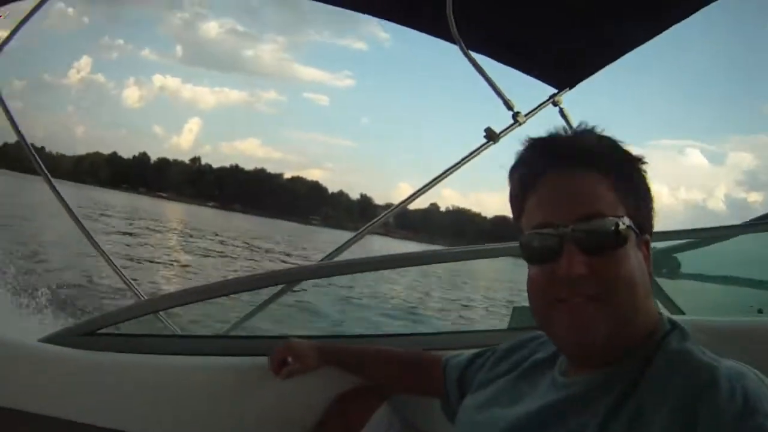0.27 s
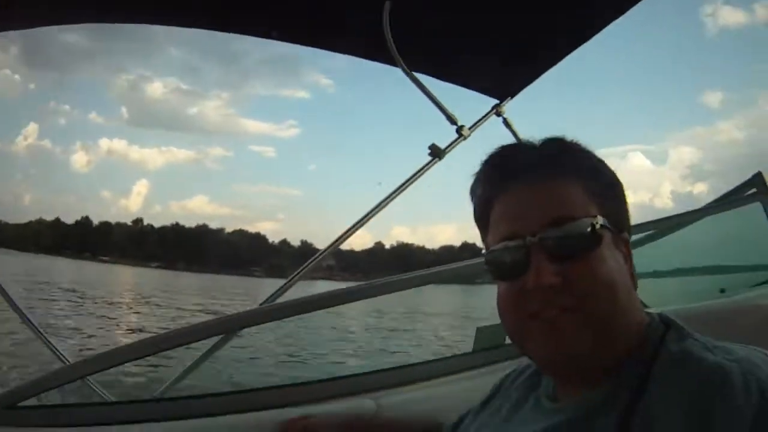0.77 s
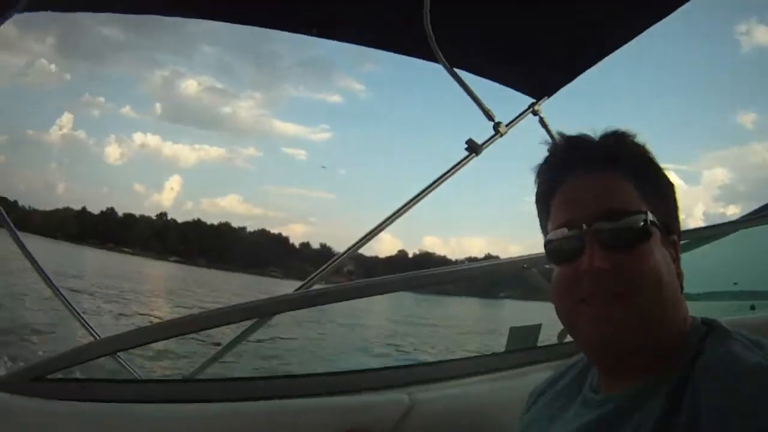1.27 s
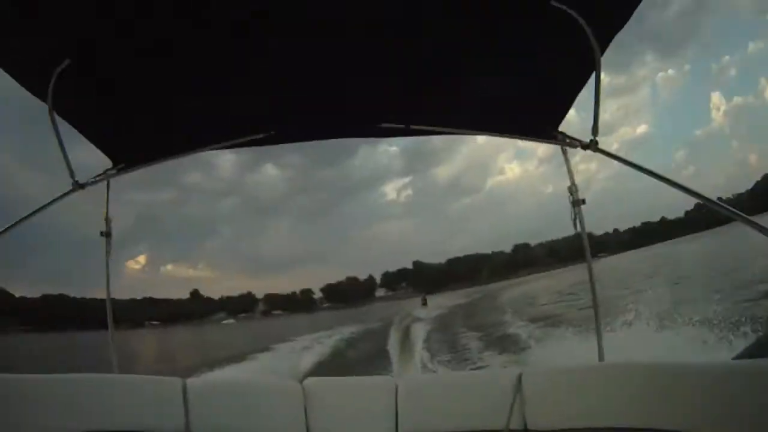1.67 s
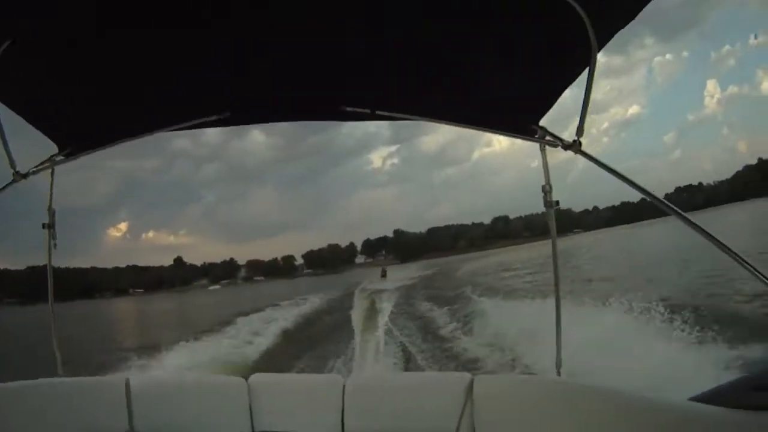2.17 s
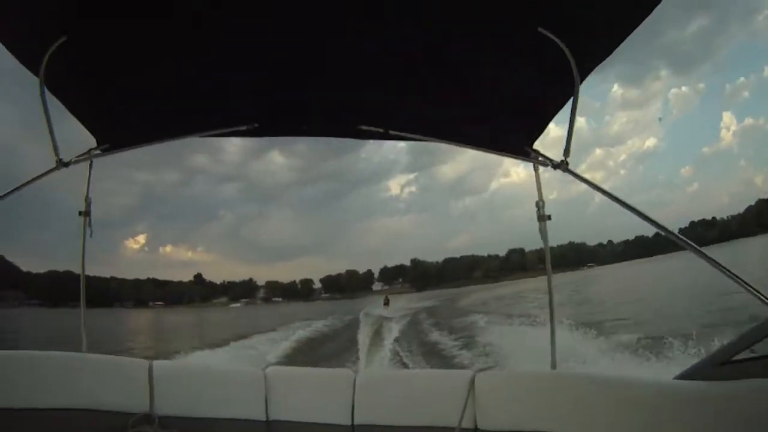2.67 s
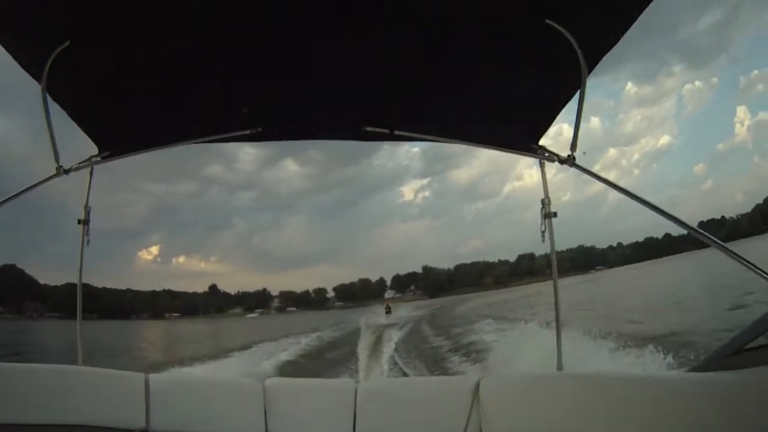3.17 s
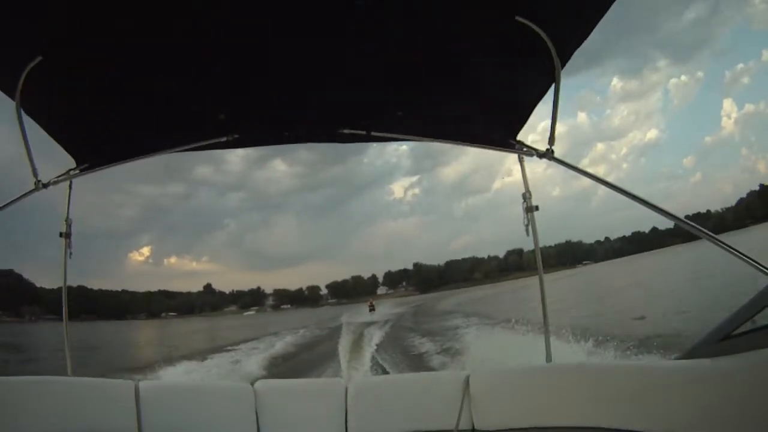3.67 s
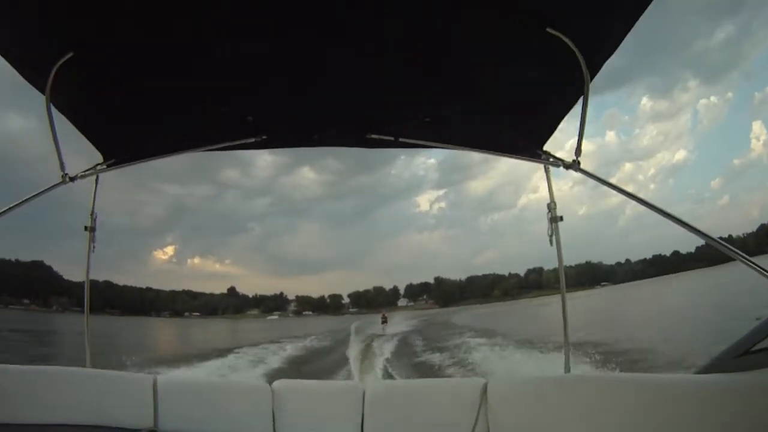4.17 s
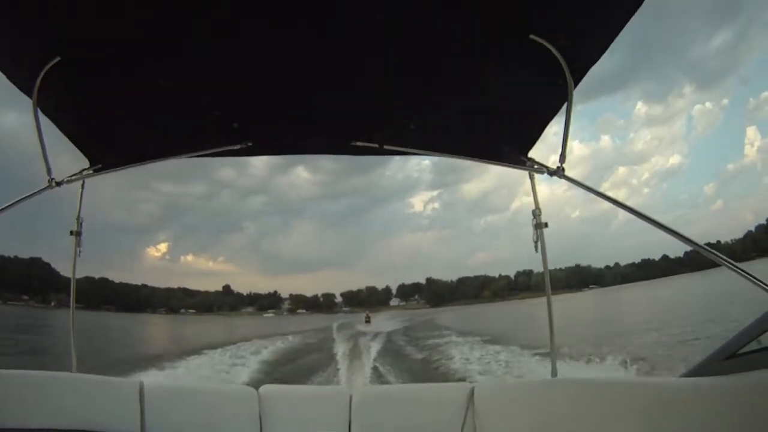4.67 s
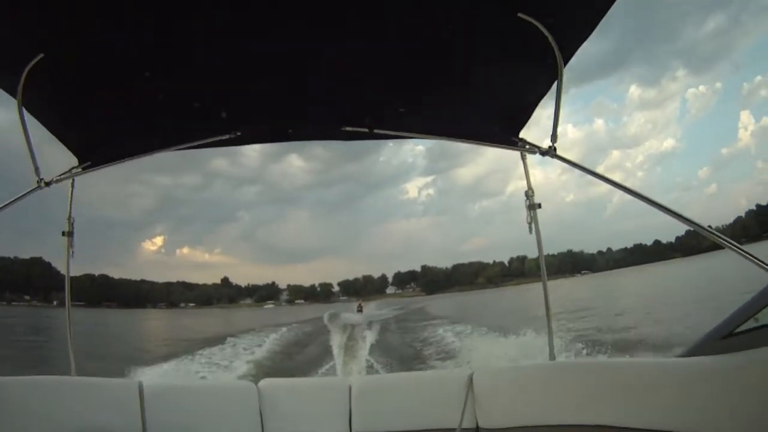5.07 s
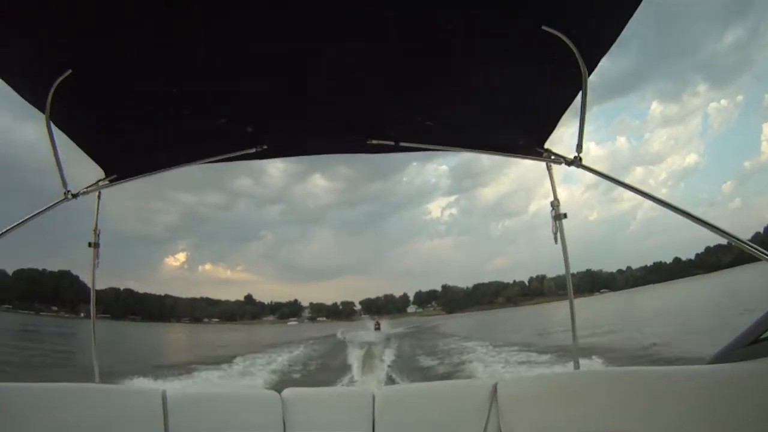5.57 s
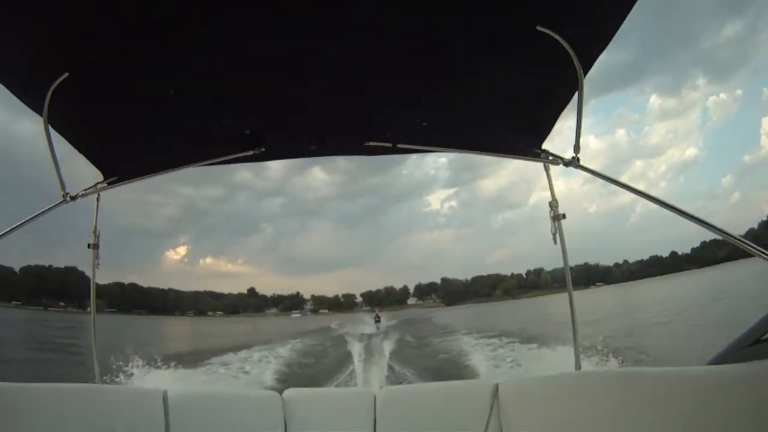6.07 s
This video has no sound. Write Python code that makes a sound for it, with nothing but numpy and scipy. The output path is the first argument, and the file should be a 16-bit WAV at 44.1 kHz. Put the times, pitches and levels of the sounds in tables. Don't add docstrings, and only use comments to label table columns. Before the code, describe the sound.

Inside a sealed plastic case on a towing motorboat, a steady low engine hum and boxy spray hiss run throughout. Wind and grip rumbles are strongest at first; a sharp rattling creak comes early, then scattered ticks and dull wave slaps as the camera turns sternward. The later part is calmer, with a few faint clicks.

```python
import sys
import numpy as np
from scipy import signal
from scipy.fft import rfft, irfft
from scipy.io import wavfile
from scipy.ndimage import uniform_filter1d

SR = 44100
rng = np.random.default_rng(int(sys.argv[2]) if len(sys.argv) > 2 else 0)


def persist_wave(psi):
    counts = np.round(np.clip(psi, -1, 1) * 32767).astype(np.int16)
    wavfile.write(sys.argv[1], SR, np.atleast_2d(counts).T)


def boost_factor(decibels):
    exponent = np.asarray(decibels, float) / 20
    return 10 ** exponent


N = 279153

# t/s, level/dB
BREEZE = [(0, -48), (1.0, -48), (1.5, -51), (2.6, -51), (3.2, -54), (4.0, -56.5), (5.0, -53.5), (6.33, -57)]
# t/s, peak level/dB, width/s
GUSTS = [(.08, -38, .05), (.19, -37, .03), (.32, -38, 0.044), (.46, -37, 0.031), (.77, -36, 0.034),
         (.93, -38.5, 0.027), (1.18, -41, 0.028), (1.33, -39, 0.018), (1.65, -48, .06), (2.06, -44, 0.027),
         (2.24, -43, 0.017), (2.45, -44, 0.046), (2.58, -40.5, 0.019), (3.95, -52, .05), (4.18, -50, 0.033),
         (4.36, -50, .06), (5.1, -54, .04)]
# t/s, peak level/dB, width/s
HULL_SWELLS = [(.08, -53, 0.051), (.41, -49, 0.044), (1.18, -40.5, .04), (1.32, -41, .04),
               (1.88, -41, 0.068), (2.08, -50, 0.039), (2.6, -47, 0.065), (4.3, -48, .08),
               (5.06, -47, 0.023), (5.33, -48, 0.034)]

# t/s, shell level/dB, thud level/dB, lid level/dB, latch level/dB
SLIPS = [(0.2906, -24, -47, -45, -35), (0.3068, -24, -25.5, -27, -36), (0.3111, -25, -23.5, -26, -31),
         (0.3255, -23, -22.5, -30, -27), (0.3365, -24, -37, -39, -32), (0.3387, -23.5, -27, -27, -21.5),
         (0.3429, -20, -22, -33, -25), (0.3521, -29, -35, -52, -40), (0.362, -30, -50, -54, -27),
         (0.3732, -26, -32, -52, -33), (0.4094, -37, -40, -34, -29), (0.4442, -48, -34, -45, -38)]
# t/s, level/dB
CREAKS = [
    (0.4113, -1.4),
    (0.4181, 0.5),
    (0.4268, 0.1),
    (0.4458, 2.8),
    (0.452, 1.0),
    (0.4575, 0.5),
    (0.4633, -0.2),
    (0.4716, -1.2),
    (1.3289, -7.5),
]
# t/s, level/dB, f/Hz, t60/s
PALM_BUMP = (1.3286, -1, 230, .005)
# t/s, latch level/dB, shell level/dB
LATCH_TICKS = [(0.0032, -31, -30.5), (0.6304, -36, -41), (0.7698, -32.5, -30), (0.7818, -24, -29),
               (0.7925, -24.5, -33), (0.809, -44, -35), (0.8318, -36, -48), (0.8567, -39, -33),
               (0.8748, -26.5, -22.5), (0.9024, -36, -43), (1.4493, -37, -30), (2.0572, -30, -42),
               (2.0737, -26.5, -33), (2.1311, -26.5, -28.5)]
# t/s, lid level/dB, shell level/dB
LID_TICKS = [(2.878, -42, -48), (2.8914, -40, -54), (2.9051, -43, -49), (2.9334, -37.5, -53),
             (2.9954, -32.5, -25.5), (3.1666, -41, -40), (4.3372, -38, -30.5), (4.37, -38.5, -29.5),
             (4.4155, -28.5, -25), (5.0394, -39.5, -33)]
LATCH_TICK_PARTS = (-12, -17.5, 0.5)
LID_TICK_PARTS = (-4.5, 0, -3.5)

# f/Hz, level/dB, t60/s
SHELL_MODES = [(2155, 2, .0105), (3600, -6, .0085), (4650, -24, .008), (5200, -27, .009), (3000, -11, .007)]
# f/Hz, level/dB, t60/s
WALL_MODES = [(170, -16, .030), (305, -4, .008), (640, 5, .003)]
# f/Hz, level/dB, t60/s
LID_MODES = [(851, 0, 0.016)]
# f/Hz, level/dB, t60/s
LATCH_MODES = [(1120, -2, .008), (1545, 3, .0075)]
LATCH_OUT_MODES = [(1120, 5, 0.0055), (1590, -5, 0.01)]

# t/s, level/dB
SPRAY = [(0.0, -37.5), (0.33, -38), (0.53, -39.5), (1.87, -39.5), (2.26, -38.5), (2.59, -39.5),
         (3.33, -39.5), (3.42, -39.5), (5.46, -40.5), (5.68, -39), (6.33, -41.5)]
# f/Hz, spectral level/dB
HISS = [(100, -24), (300, -25.5), (600, -20.5), (1200, -20), (1800, -33.5), (2700, -14.5), (4100, -24.5),
        (5000, -17.5), (5600, -23), (6000, -28.5)]
# f/Hz, bandwidth/Hz, level/dB
CASE = [(928, 91, -10.5), (1108, 86, -15.5), (1492, 190, -12), (1745, 66, -12), (2200, 275, 0),
        (3055, 270, -11), (3378, 820, -9.5), (5190, 110, -15.5)]
# t/s, length/s, lift/dB
STROKES = [
    (0.284, .09, 9),
    (.77, 0.1, 2.5),
    (1.322, .14, 7),
    (2.856, 0.072, 0.5),
]

# t/s, firing rate f/Hz, level/dB
ENGINE = [(0, 217.5, -47), (1.3, 218.4, -46.5), (2.6, 219, -47), (3.8, 220, -47.5), (5.1, 220.6, -47.5),
          (6.33, 221.8, -48)]
# multiple of the two-turn cycle, level/dB
ORDERS = [(2, -20), (3, -14), (4, -1), (5, -16), (6, -9), (7, -10.5), (8, -2.5), (9, -11.5), (10, -14),
          (11, -11.5), (12, -21), (13, -27), (14, -19), (15, -24), (16, -9.5), (17, -14.5), (18, -19.5),
          (19, -22.5), (33, -23), (44, -18)]


def read(points, hz):
    f, value = np.transpose(points)
    return np.interp(np.log(hz + 1), np.log(f + 1), value)


def follow(rows, t):
    s, *columns = np.transpose(rows)
    return [np.interp(t, s, c) for c in columns]


def evened(x):
    return x / np.sqrt(np.mean(x ** 2) + 1e-20)


def drift(rate_hz, count):
    knots = rng.standard_normal((count, 1000))
    at = np.arange(N) / SR * rate_hz
    return np.array([evened(np.interp(at, np.arange(1000), k)) for k in knots])


def noise(gain, patch_db, flicker_db, size=512):
    frames = 4 * N // size + 5
    hz = np.fft.rfftfreq(size, 1 / SR)
    real, imaginary, patches = rng.standard_normal((frames, len(hz), 3)).T
    patches = uniform_filter1d(patches, size=6, axis=0)
    patches = evened(uniform_filter1d(patches, size=12, axis=1))
    flicker = evened(uniform_filter1d(rng.standard_normal(frames), size=4))
    spectra = (real + 1j * imaginary) * gain(hz)[:, None]
    spectra = spectra * boost_factor(patch_db * patches + flicker_db * flicker)
    return signal.istft(spectra, nperseg=size, noverlap=3 * size // 4)[1][:N]


def swells(rows, t):
    return sum(boost_factor(2 * db) * np.exp(-((t - s) / width) ** 2) for s, db, width in rows)


def lump_gain(hz):
    return hz ** 2 / (hz ** 2 + 90.) / (1 + (hz / 85.) ** 3)


def roar_gain(hz):
    return 1 / (1 + (68.0 / (hz + 1)) ** 4) / (1 + (hz / 330.0) ** 3)


def wind(t):
    (breeze_db,) = follow(BREEZE, t)
    lumps = noise(lump_gain, patch_db=1.0, flicker_db=1.0, size=2048)
    roar = noise(roar_gain, patch_db=-1.0, flicker_db=2.5, size=2048)
    flutter = boost_factor(2.0 * drift(10.0, count=1)[0])
    pressure = np.sqrt((boost_factor(breeze_db) * flutter) ** 2 + swells(GUSTS, t))
    roar_db = -49 + 0.24 * (breeze_db + 53.5)
    hull = np.sqrt(boost_factor(2 * roar_db) + swells(HULL_SWELLS, t))
    return pressure * evened(lumps) + boost_factor(-5.0) * hull * evened(roar)


def ring(modes, turn=-1):
    t = np.arange(2000) / SR
    waves = 0
    for k, (hz, db, t60) in enumerate(modes):
        waves = waves + turn ** k * boost_factor(db - 60 * t / t60) * np.sin(2 * np.pi * hz * t)
    return (1 - np.exp(-t / .002)) * waves


def tick_blows():
    blows = []
    for rows, parts_db in (LATCH_TICKS, LATCH_TICK_PARTS), (LID_TICKS, LID_TICK_PARTS):
        for s, db, shell_db in rows:
            blows.append((s, shell_db, *np.add(db, parts_db)))
    return blows


def mount():
    out = np.zeros(N + 4000)
    creak = ring(SHELL_MODES) + ring(WALL_MODES, turn=1) + ring(LATCH_MODES)
    for s, db in CREAKS:
        out[int(s * SR):][:2000] -= boost_factor(db) * creak
    s, db, hz, t60 = PALM_BUMP
    out[int(s * SR):][:2000] -= ring([(hz, db, t60)])
    part_gain_db = (12.5, 20.6, 14.3, 13.1)
    for rows, way, latch in (SLIPS, -1, LATCH_MODES), (tick_blows(), 1, LATCH_OUT_MODES):
        parts = np.array([ring(SHELL_MODES), ring(WALL_MODES, turn=1), ring(LID_MODES), ring(latch)])
        for s, *blows_db in rows:
            out[int(s * SR):][:2000] += way * boost_factor(np.add(blows_db, part_gain_db)) @ parts
    return out[:N]


def through_case(hz):
    power = boost_factor(2 * read(HISS, hz))
    for centre_hz, width_hz, db in CASE:
        detuning = 2 * (hz - centre_hz) / width_hz
        power = power + boost_factor(2 * db) / (1 + detuning ** 2) ** 2
    return np.sqrt(power)


def strokes(t):
    rise_s, fall_s = 0.023, 0.044
    lift_db = 2. * np.exp(-t / 0.54) - 0.4
    for s, length, db in STROKES:
        rise = (t - s) / rise_s
        fall = 1 - (t - s - length) / fall_s
        lift_db = lift_db + db * np.clip(np.minimum(rise, fall), 0, 1)
    return lift_db


def spray(t, cycles):
    (level_db,) = follow(SPRAY, t)
    hiss = evened(noise(through_case, patch_db=0.57, flicker_db=0.5, size=1024))
    low = signal.sosfiltfilt(signal.butter(4, 1850, fs=SR, output="sos"), hiss)
    throb = 1 + 0.067 * np.cos(2 * np.pi * 4 * cycles)
    return boost_factor(level_db) * throb * (hiss + (boost_factor(strokes(t)) - 1) * low)


def engine(t):
    firing_hz, level_db = follow(ENGINE, t)
    cycles = np.cumsum(firing_hz / 8) / SR
    waver = drift(11., count=len(ORDERS))
    slip = drift(5., count=len(ORDERS))
    start = rng.random(len(ORDERS))
    hum = np.zeros(N)
    for (k, db), w, s, p in zip(ORDERS, waver, slip, start):
        phase = 2 * np.pi * (np.round(k) * cycles + p) + 0.55 * s
        hum += boost_factor(db + 1.66 * w) * np.cos(phase)
    return boost_factor(level_db) * hum, cycles


def scene():
    t = np.arange(N) / SR
    hum, cycles = engine(t)
    return (wind(t) + mount() + spray(t, cycles) + hum)[None]


def top_cut(x):
    return signal.sosfilt(signal.butter(12, 16650, fs=SR, output="sos"), x)


def record(dry):
    hold_hz, step_hz, edge_hz = 12000, 48000, 15330
    mirrored = np.concatenate([dry, dry[:, ::-1]], axis=1)
    hz = np.fft.rfftfreq(2 * N, 1 / SR)
    base = irfft(rfft(mirrored) * (hz < hold_hz / 2), 2 * N)
    sampled = base * (1 + 2 * np.cos(2 * np.pi * hold_hz * np.arange(2 * N) / SR))
    hold = np.sinc(hz / hold_hz) / np.sinc(hz / step_hz)
    hold *= np.clip((edge_hz + 60 - hz) / 120, 0, 1) ** 3
    mix = irfft(rfft(sampled) * hold, 2 * N)[:, :N]
    return top_cut(mix)


dry = scene()
out = record(dry)
persist_wave(out)
```